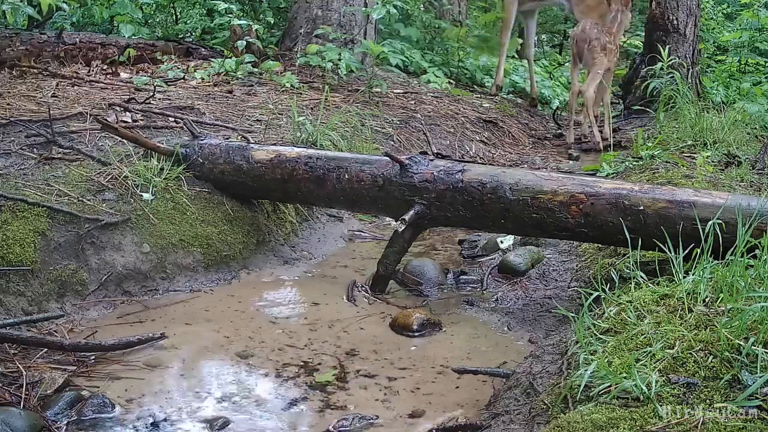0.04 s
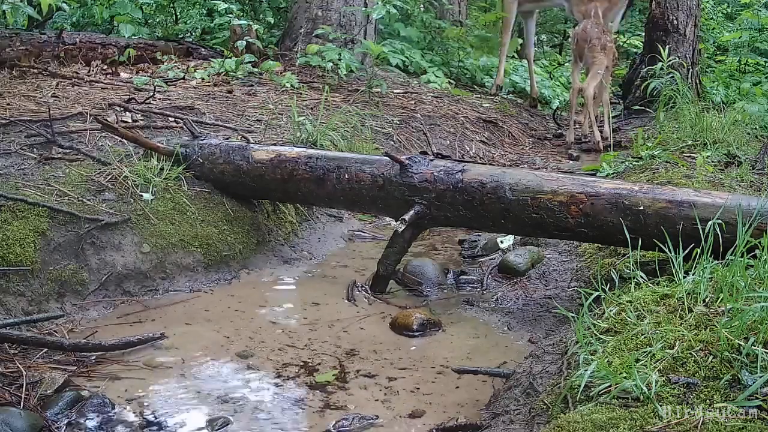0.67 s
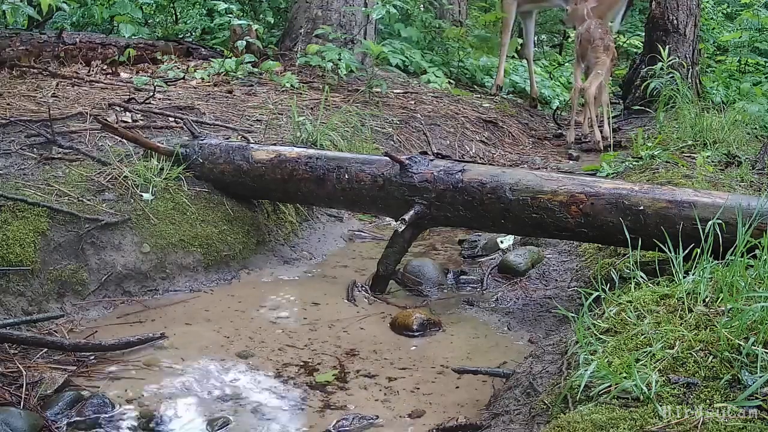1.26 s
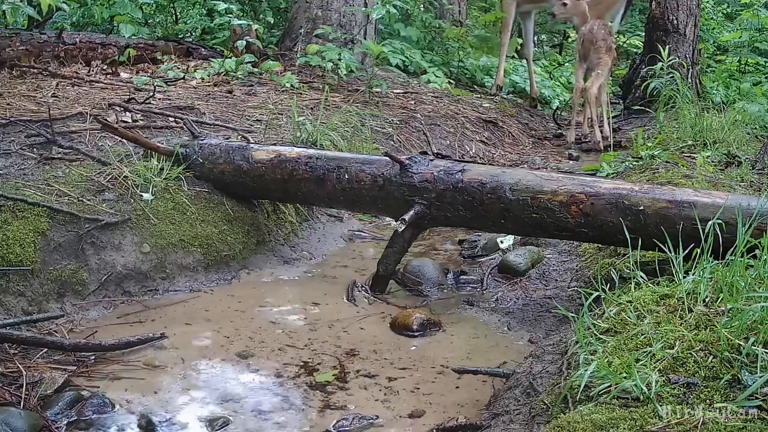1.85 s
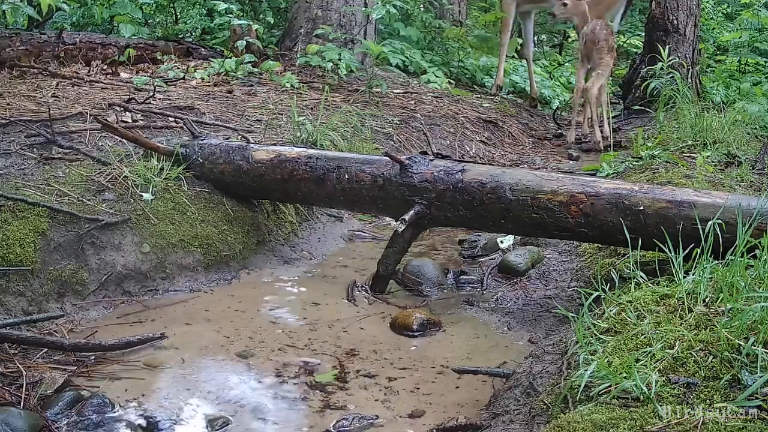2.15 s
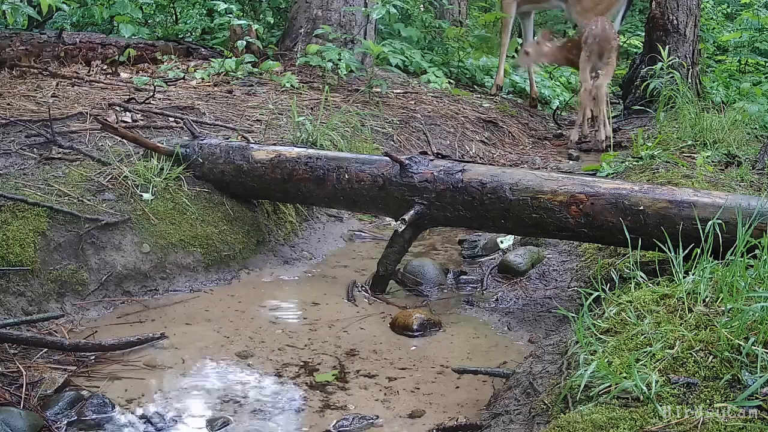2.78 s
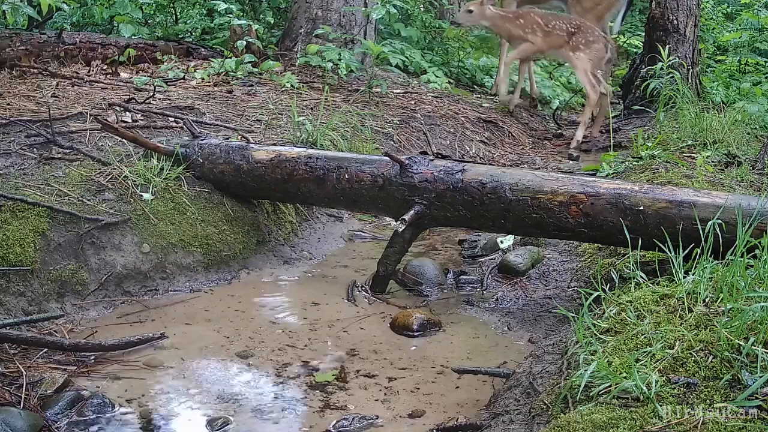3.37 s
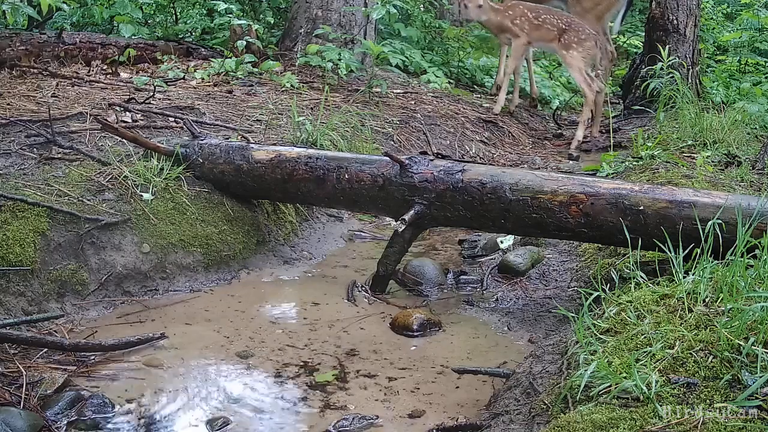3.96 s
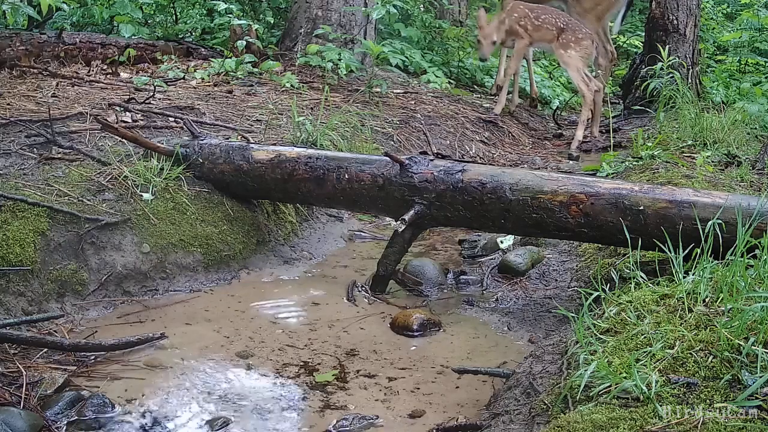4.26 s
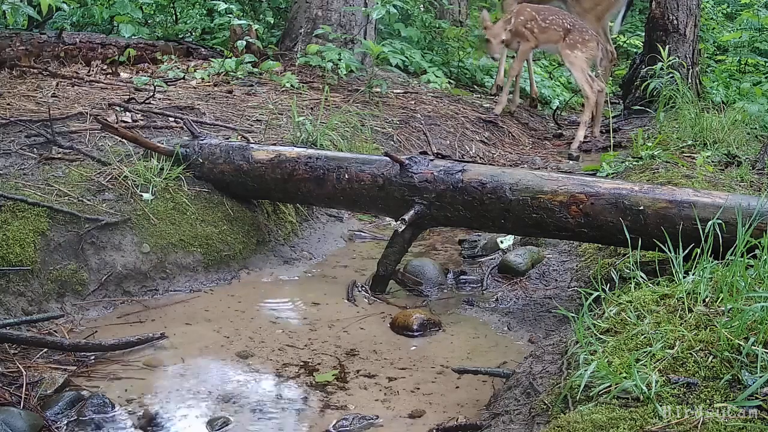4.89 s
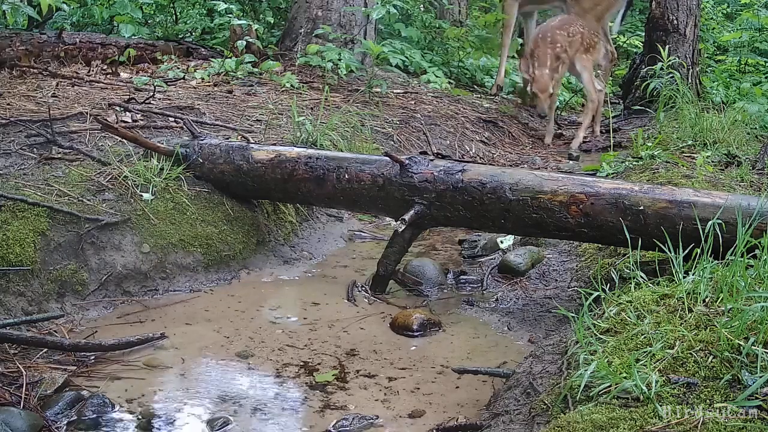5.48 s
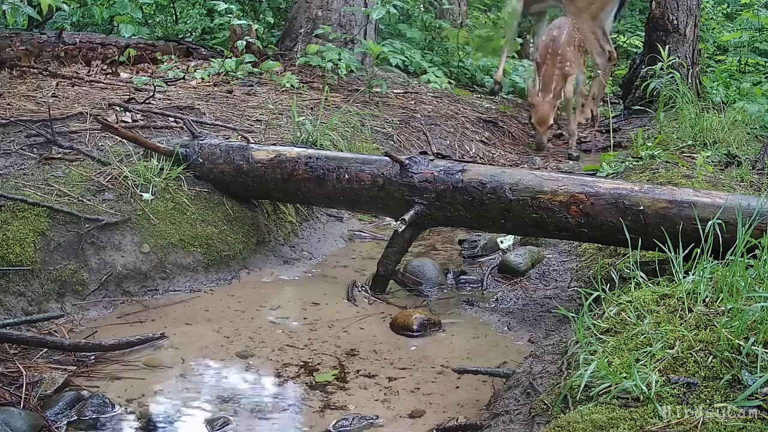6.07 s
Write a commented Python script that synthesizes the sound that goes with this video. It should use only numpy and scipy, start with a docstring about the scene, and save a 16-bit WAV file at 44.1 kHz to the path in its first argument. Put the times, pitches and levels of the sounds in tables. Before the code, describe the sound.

A quiet wood by a muddy pool. Throughout, distant wind and traffic make a low, steady rumble, with a thin hiss and a barely audible, very high shimmer above it. Faint, dull drips plop irregularly, slightly clearer at about 1.1, 3.5, 4.8 and 5.5 seconds. A dry twig gives one small, sharp tick at 2.5 seconds, with fainter ticks at the start and at 4.3. Around 3 seconds a fawn's hooves make a quick cluster of deep, soft thuds, as if felt through the ground; these are the loudest sounds. Another thud comes at 4.7 seconds, and weaker ones at 5.2 and 6.1. A faint, distant engine hum swells once, peaking near 5.3 seconds. From about 5.2 seconds to the end, a tiny lens motor near the microphone whirs and whines very faintly, with a few short, high nudges.

```python
"""A quiet wood by a muddy pool: far wind and traffic rumble under a thin hiss and a very high shimmer.
A dry twig ticks, dull drips plop, and the faint hum of a distant engine swells once.
A fawn shifts about: a few deep, soft thuds ring near 60 Hz, probably its hooves felt through the ground.
Near the end a small motor, likely in a camera lens, whines faintly over its whirring gears."""
import sys
import numpy as np
from scipy import signal
from scipy.fft import rfft, irfft, next_fast_len
from scipy.io import wavfile
from scipy.ndimage import uniform_filter1d

SR = 44100
rng = np.random.default_rng(int(sys.argv[2]) if len(sys.argv) > 2 else 0)


def int16_out(signal):
    """Quantize to a 16-bit WAV file."""
    q = np.round(np.clip(np.atleast_2d(signal).T, -1, 1) * 32767)
    wavfile.write(sys.argv[1], SR, q.astype(np.int16))


N = 274743
TIME = np.arange(N) / SR


def gain_of(db):
    """Turns decibels into a number to multiply a sound by."""
    return 10 ** (np.asarray(db) / 20)


def evened(x):
    """Scales a signal so that its average strength (rms) is 1."""
    return x / np.sqrt(np.mean(x ** 2) + 1e-20)


def add(mix, start_s, sound):
    """Lays a sound into the mix at the given time."""
    part = mix[max(round(start_s * SR), 0):][:len(sound)]
    part += sound[:len(part)]


def drift(rate_hz):
    """A random wobble of strength 1 that moves up to about rate_hz times a second."""
    size = next_fast_len(N)
    hz = np.fft.rfftfreq(size, 1 / SR)
    white = rfft(rng.standard_normal(size))
    return evened(irfft(white / (1 + (hz / rate_hz) ** 4), size)[:N])


def shaped_noise(shape):
    """Noise of strength 1, with its bass and treble balanced by a table."""
    points_hz, points_db = np.transpose(shape)
    size = next_fast_len(N)
    hz = np.fft.rfftfreq(size, 1 / SR)
    balance = gain_of(np.interp(np.log(hz + 1), np.log(points_hz + 1), points_db))
    white = rfft(rng.standard_normal(size))
    return evened(irfft(white * balance, size)[:N])


# The rumble from low to high: (frequency [Hz], relative level [dB])
RUMBLE_SHAPE = [(8.8, -23), (15, -1.5), (65, 0.5), (130, -8), (173, -6), (214, -7.5), (382, -27),
                (481, -30), (825, -41), (1500, -52.5), (1950, -67), (3300, -120)]


def far_rumble(level_db=-49, sway_db=0.08):
    """Far wind and traffic sway slightly, their treble lost among the trees."""
    return gain_of(level_db + sway_db * drift(0.69)) * shaped_noise(RUMBLE_SHAPE)


# The engine's tones: (multiple of the firing rate, relative level [dB])
ENGINE_TONES = [(1, -2.5), (2, -1), (3, -11.5)]


def engine_hum(firing_hz=87.8, waver=0.012, flutter_db=1.0, base_db=-68, swell_db=-57):
    """A distant engine at steady speed swells once; its tones waver on their way through the air."""
    swell_at_s, swell_width_s = 5.32, 1.0
    swell = np.exp(-((TIME - swell_at_s) / swell_width_s) ** 2)
    loudness = gain_of(base_db) + gain_of(swell_db) * swell
    cycles = np.cumsum(firing_hz * (1 + waver * drift(7.15))) / SR
    tones = sum(gain_of(db + flutter_db * drift(6.1)) * evened(np.sin(2 * np.pi * multiple * cycles))
                for multiple, db in ENGINE_TONES)
    return loudness * tones


# The hiss from low to high: (frequency [Hz], relative level [dB])
HISS_SHAPE = [(530, -32.5), (900, -3), (2200, -4.5), (4080, -6), (4490, -5.5), (5110, -8), (6190, -7),
              (8040, -8.5), (12500, -7.5), (14600, -9.5), (15500, -10.5)]


def hiss(level_db=-75, patchy_db=2.0, flicker_db=0.8, smooth_below_hz=4200):
    """A thin hiss whose treble flickers in small patches."""
    hz, t, grid = signal.stft(shaped_noise(HISS_SHAPE), SR, nperseg=512)  # split by pitch and time
    specks = rng.standard_normal(grid.shape)
    streaks = uniform_filter1d(specks, size=7, axis=0)  # blur across pitch
    patches = evened(uniform_filter1d(streaks, size=10, axis=1))  # then across time
    flicker = np.interp(t, TIME, drift(22))
    treble = 1 / (1 + (smooth_below_hz / (hz[:, None] + 1)) ** 4)
    grid = grid * gain_of(treble * (patchy_db * patches + flicker_db * flicker))
    return gain_of(level_db) * evened(signal.istft(grid, nperseg=512)[1][:N])


def shimmer(hz=12650, spread_hz=520, level_db=-92, speck_s=0.013, specks_per_s=30):
    """Tiny specks of very high noise come at random moments."""
    starts = (rng.random(N) < specks_per_s / SR) * rng.random(N)
    speck = np.hanning(int(speck_s * SR))
    power = signal.oaconvolve(starts, speck ** 2)[:N]  # overlapping specks add in power
    high_noise = drift(spread_hz) * np.sin(2 * np.pi * hz * TIME)
    return gain_of(level_db) * evened(np.sqrt(abs(power)) * high_noise)


# Each tick of the twig: (time [s], peak level [dB])
TWIG_TICKS = [(0.137, -68), (2.5038, -54), (4.275, -67)]
# The twig's ringing tones: (pitch [Hz], relative level [dB], time to fade by 60 dB [s])
TWIG_TONES = [(4470, -5, 0.0085), (4780, -6, .008), (6100, -11, .006), (6800, -7, 0.0064),
              (9800, -6.5, 0.01)]


def twig_ticks(rise_s=0.00055):
    """A dry twig cracks and rings for a few thousandths of a second."""
    out, t = np.zeros(N), np.arange(SR // 20) / SR
    for start_s, peak_db in TWIG_TICKS:
        ring = sum(gain_of(db - 60 * t / fade_s) * np.sin(2 * np.pi * (hz * t + rng.random()))
                   for hz, db, fade_s in TWIG_TONES)
        ring *= np.minimum(t / rise_s, 1)
        add(out, start_s, gain_of(peak_db) * ring / abs(ring).max())
    return out


# The clearer drips: (time [s], peak level [dB], pitch [Hz])
CLEAR_DRIPS = [(1.144, -61, 450), (2.84, -67.5, 643), (3.24, -65, 486), (3.475, -63.5, 454),
               (4.819, -59.5, 457), (5.485, -58.5, 456)]


def drips(rise_s=0.0067, faint_count=20):
    """Drips land with soft, short plops; many fainter ones fall at random."""
    faint_drips = rng.uniform([0, -78, 370], [N / SR, -68, 570], (faint_count, 3))  # columns as above
    out, t = np.zeros(N), np.arange(SR // 8) / SR
    swell = t / rise_s * np.exp(1 - t / rise_s)
    for start_s, db, hz in [*CLEAR_DRIPS, *faint_drips]:
        add(out, start_s, gain_of(db) * swell * np.sin(2 * np.pi * hz * t))
    return out


# Each thud in the ground: (time [s], level [dB], pitch [Hz], rise time [s], fade time [s])
GROUND_THUDS = [(2.859, -37.5, 58.4, 0.058, 0.076), (2.994, -19.5, 66.1, 0.054, 0.019),
                (3.082, -21.5, 55.96, 0.029, 0.083), (4.687, -28.5, 58.7, 0.0057, 0.072),
                (5.16, -37, 55, 0.034, 0.091), (6.115, -38.5, 62, 0.028, 0.13)]
# A thud's brief higher tone: (multiple of the pitch, relative level [dB], fade time [s])
THUD_HIGHER_TONE = (1.435, -3, 0.018)


def ground_thuds():
    """Each push, probably a hoof, makes the ground ring deeply; only a quick one wakes the higher tone."""
    out, t = np.zeros(N), np.arange(SR // 2) / SR
    multiple, higher_db, higher_fade_s = THUD_HIGHER_TONE
    for start_s, db, hz, rise_s, fade_s in GROUND_THUDS:
        rise = np.minimum(t / rise_s, 1) ** 1.17
        fade = np.exp(-(np.maximum(t - rise_s, 0) / fade_s) ** 1.7)
        angle = 2 * np.pi * hz * t
        higher = gain_of(higher_db) * np.exp(-t / higher_fade_s) * np.sin(multiple * angle)
        add(out, start_s, gain_of(db) * rise * fade * (np.sin(angle) + higher))
    return out


def running(runs, ramp_s):
    """The loudness of a motor that starts, holds and stops once for each row."""
    return sum(gain_of(db) * np.clip(np.minimum(TIME - start_s, start_s + length_s - TIME) / ramp_s, 0, 1)
               for start_s, length_s, db in runs)


def whine(tones, jitter_hz, flutter_db):
    """A motor's thin tones, each wavering in pitch and loudness in its own way."""
    out = np.zeros(N)
    for hz, db in tones:
        pitch_hz = hz + jitter_hz * (drift(160) + drift(6))
        tone = np.sin(2 * np.pi * np.cumsum(pitch_hz) / SR)
        out += gain_of(db) * evened(tone * gain_of(flutter_db * drift(25)))
    return out


# When the gears turn: (time [s], length [s], level [dB])
GEAR_TURNS = [(5.2, .2, -83.5), (5.47, .85, -81.5)]
# Their whirr from low to high: (frequency [Hz], relative level [dB])
GEAR_SHAPE = [(3000, -26), (4400, -8), (5300, -8), (6300, -5.5), (8300, 0), (11000, -8), (14500, -5),
              (16000, -11.5)]
# The motor's long move: (time [s], length [s], level [dB])
LONG_MOVE = [(5.46, .52, -84.5)]
# Its tones: (pitch [Hz], relative level [dB])
LONG_MOVE_TONES = [(1120, -4), (7060, -1), (7500, -11), (8230, -4.5), (14160, -1), (15260, -5)]
# The motor's short nudges: (time [s], length [s], level [dB])
SHORT_MOVES = [(5.615, .115, -84), (5.795, .072, -81), (5.88, .052, -83)]
# Their tones: (pitch [Hz], relative level [dB])
SHORT_MOVE_TONES = [(4040, -8), (4355, 0), (4620, -9)]


def lens_motor():
    """Small gears whirr while a motor makes one long, unsteady move and a few cleaner nudges."""
    long_move = running(LONG_MOVE, ramp_s=0.06) * whine(LONG_MOVE_TONES, jitter_hz=48, flutter_db=5)
    nudges = running(SHORT_MOVES, ramp_s=0.008) * whine(SHORT_MOVE_TONES, jitter_hz=18, flutter_db=2)
    gears = running(GEAR_TURNS, ramp_s=0.026) * shaped_noise(GEAR_SHAPE)
    return gears + long_move + nudges


def scene():
    """All the sounds of the wood, added into one channel."""
    background = far_rumble() + engine_hum() + hiss() + shimmer()
    return (background + twig_ticks() + drips() + ground_thuds() + lens_motor())[None]


def record(dry):
    """Cuts away the very highest treble."""
    cutoff_hz = 15720
    treble_cut = signal.firwin(511, cutoff_hz, window=("kaiser", 9), fs=SR)
    return signal.oaconvolve(dry, treble_cut[None], "same")


dry = scene()
out = record(dry)
int16_out(out)
```